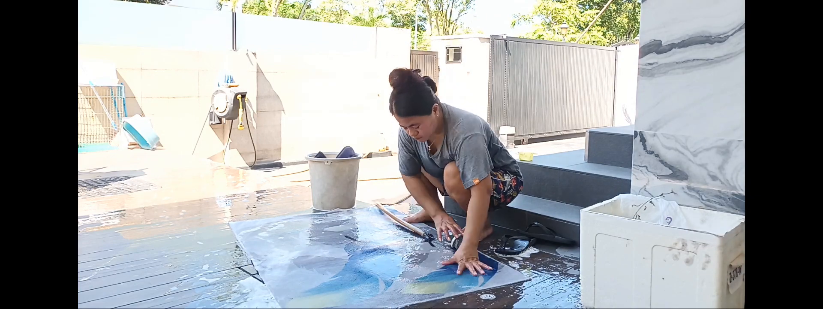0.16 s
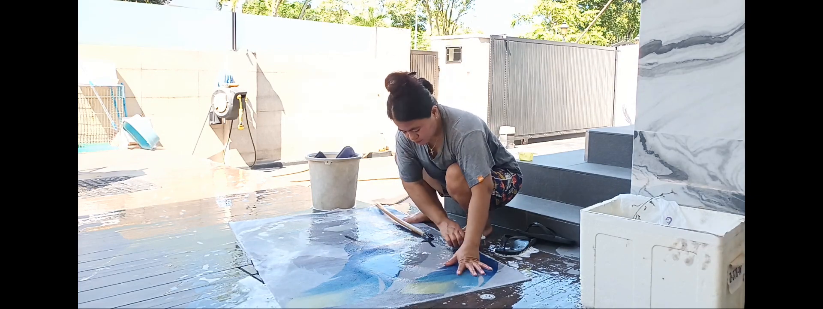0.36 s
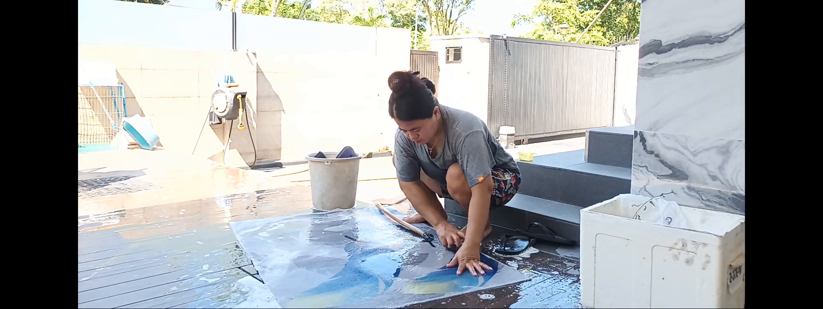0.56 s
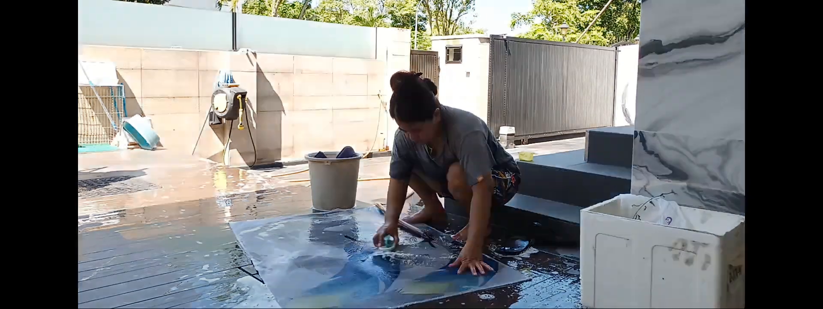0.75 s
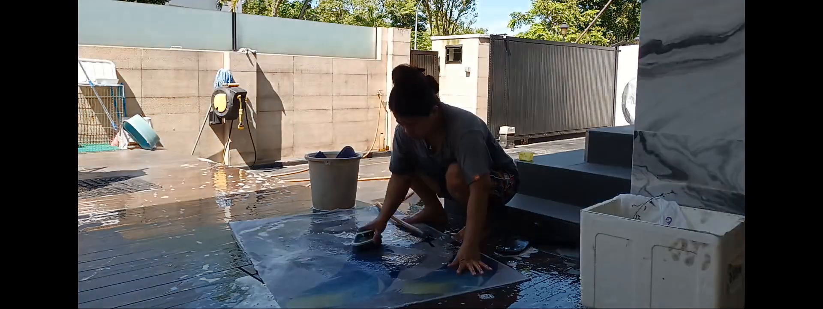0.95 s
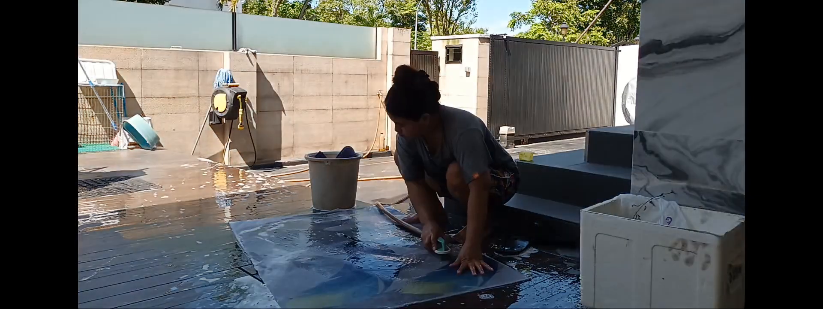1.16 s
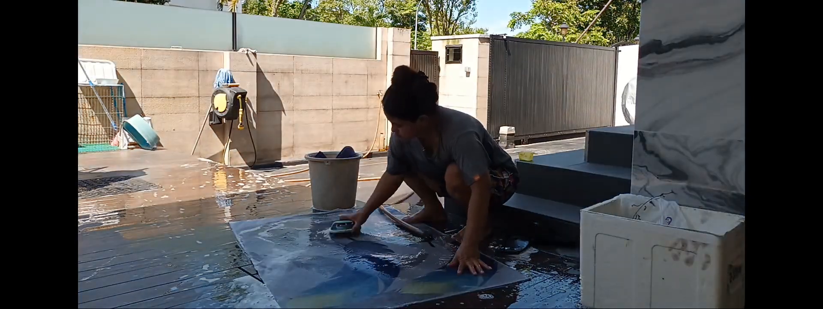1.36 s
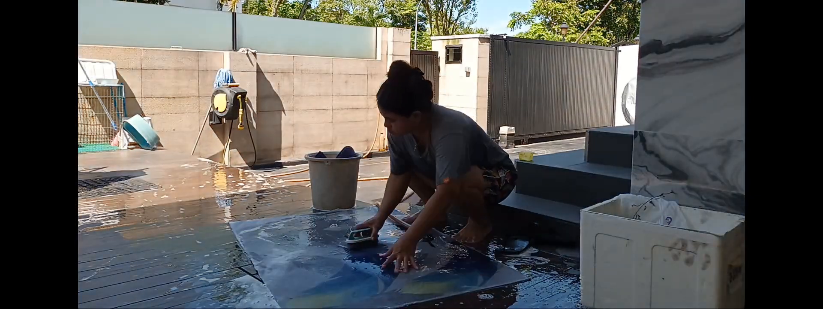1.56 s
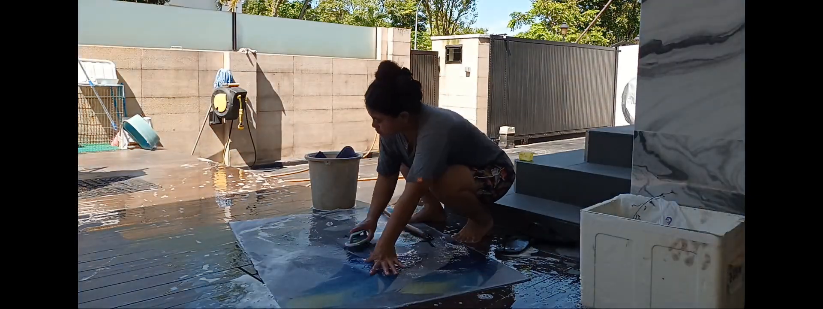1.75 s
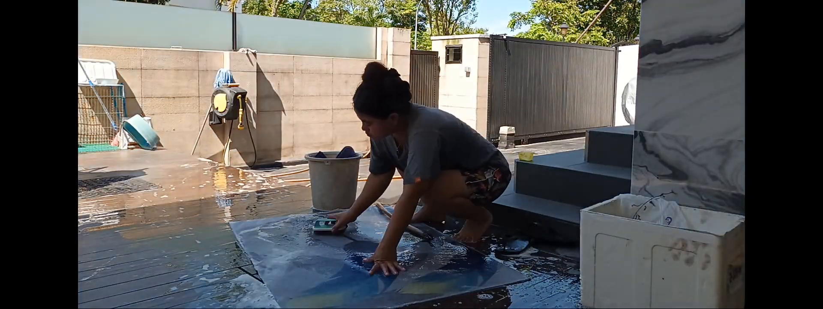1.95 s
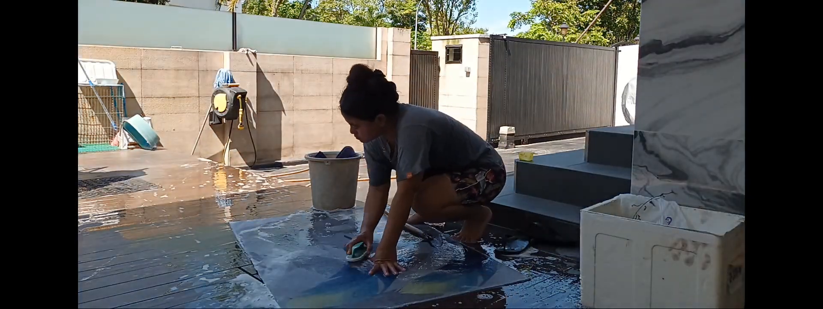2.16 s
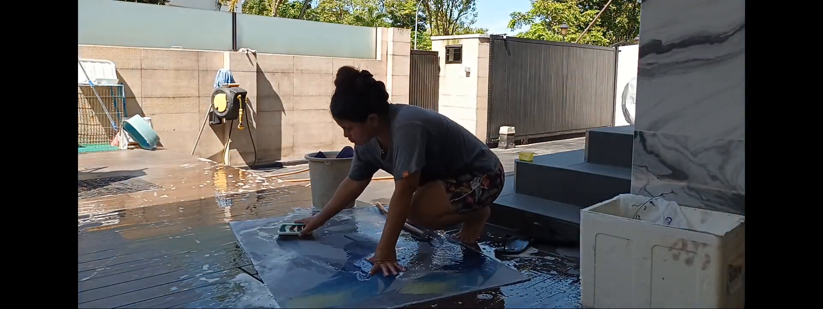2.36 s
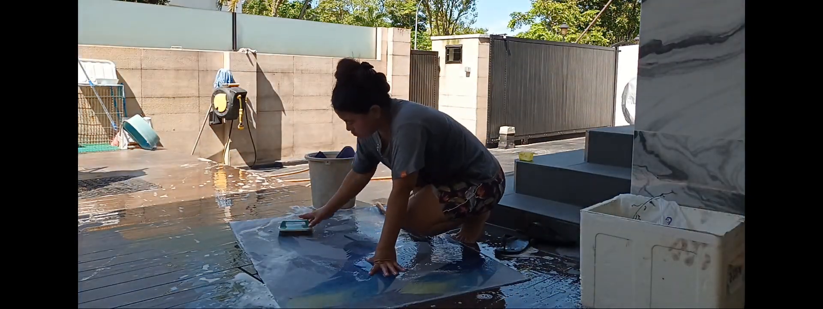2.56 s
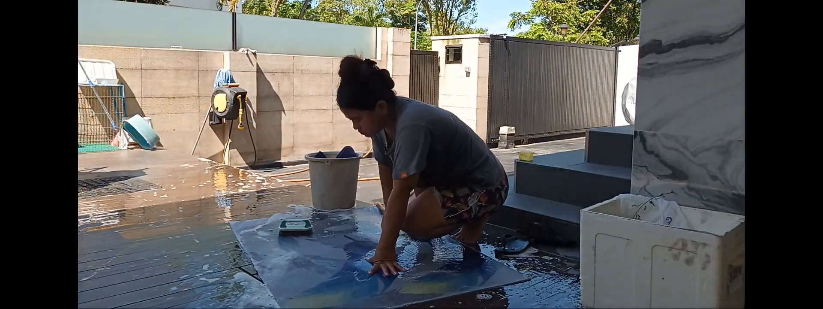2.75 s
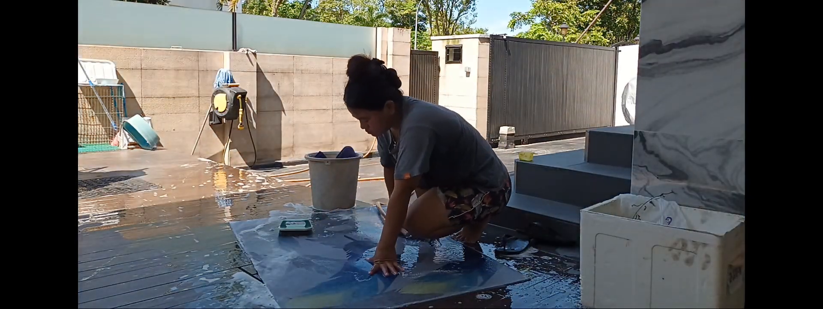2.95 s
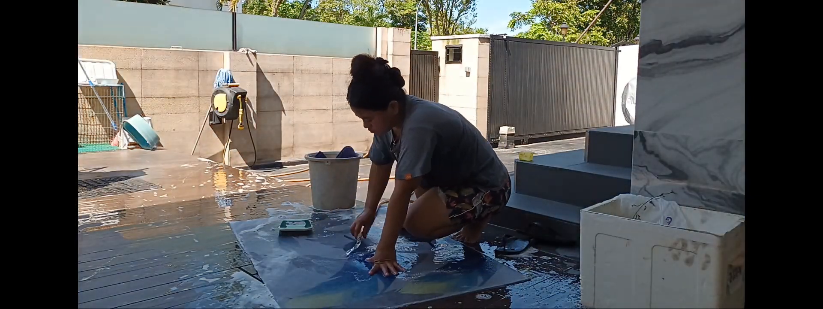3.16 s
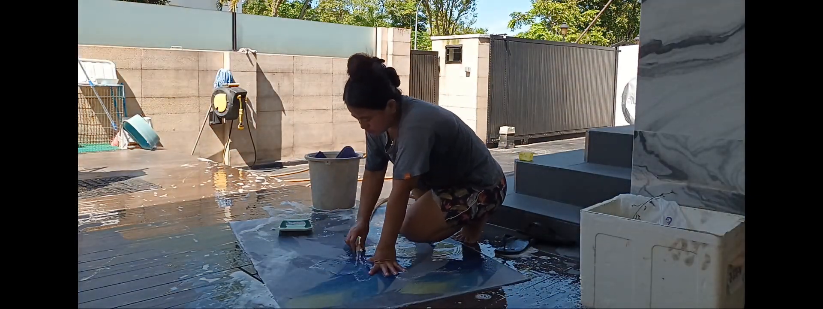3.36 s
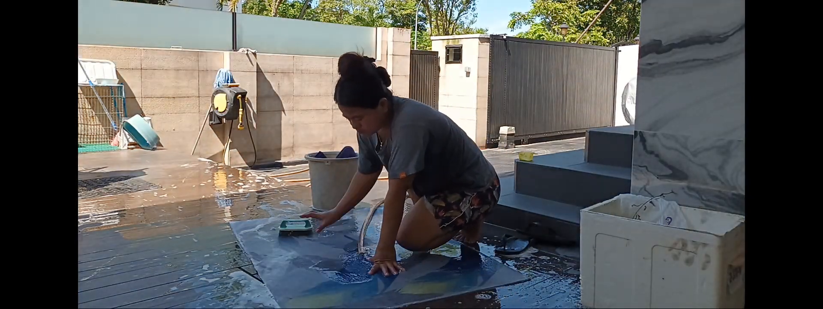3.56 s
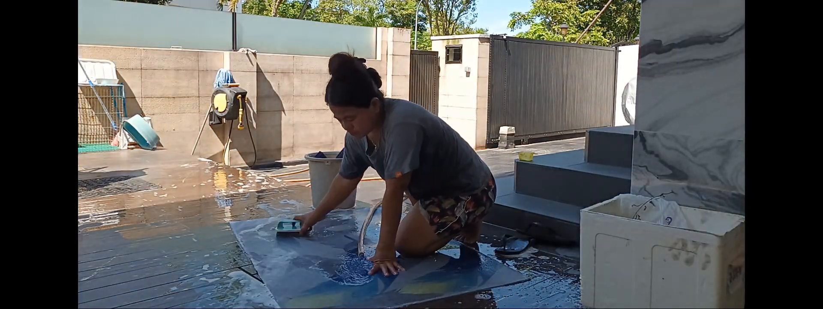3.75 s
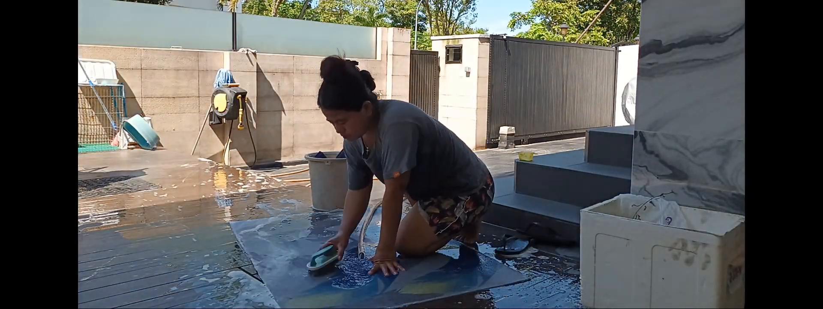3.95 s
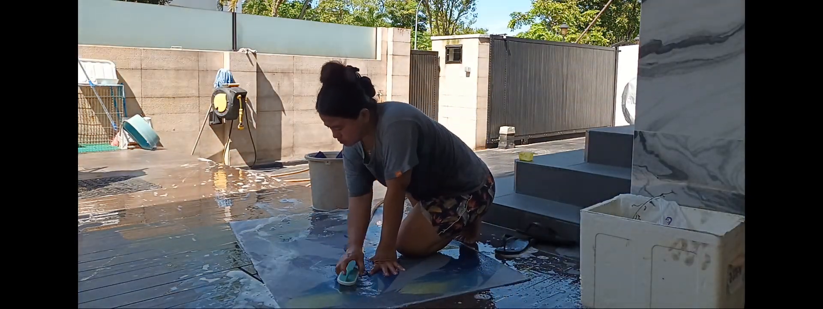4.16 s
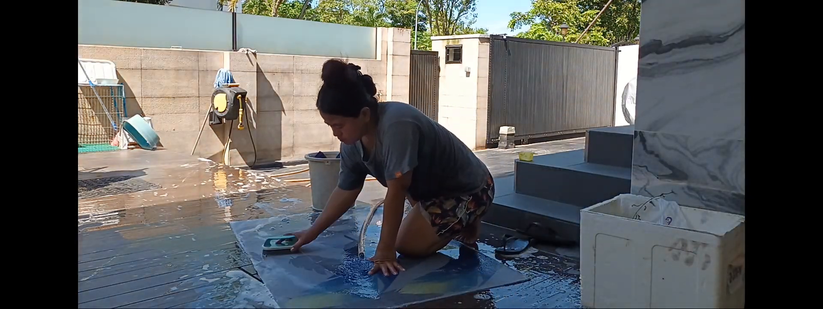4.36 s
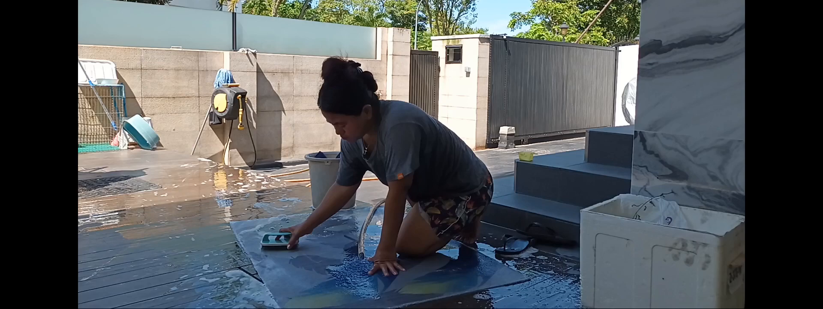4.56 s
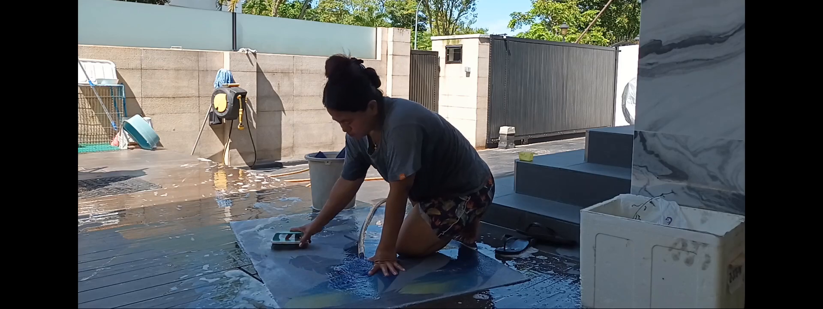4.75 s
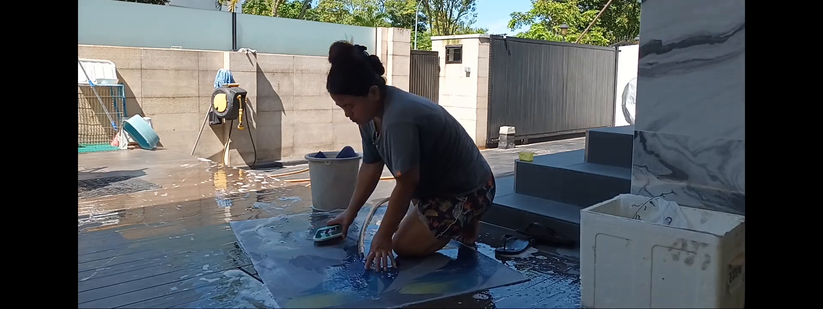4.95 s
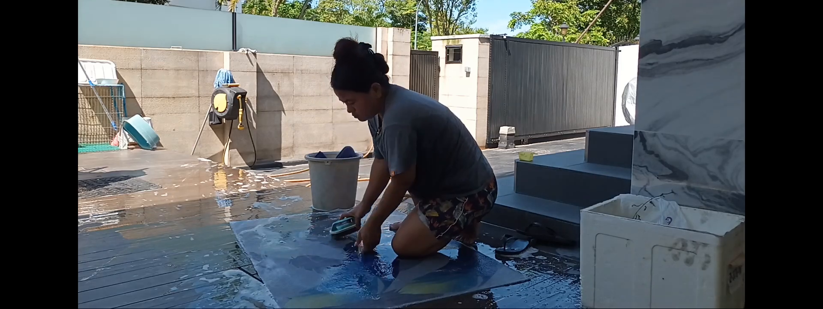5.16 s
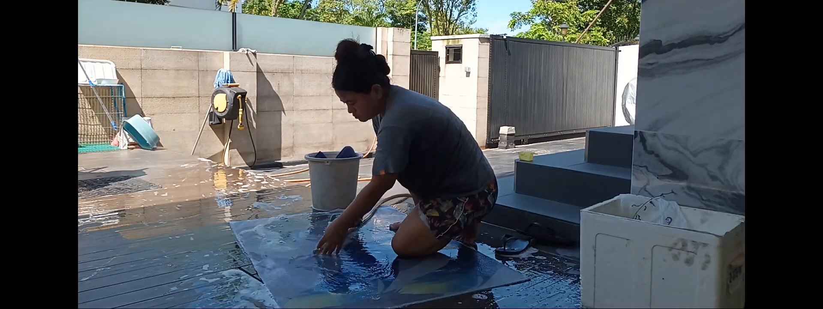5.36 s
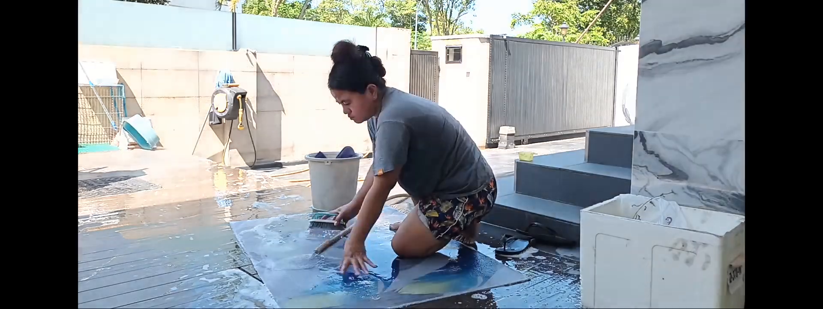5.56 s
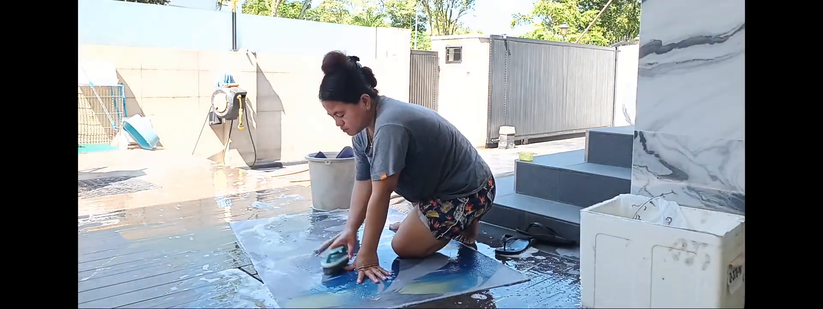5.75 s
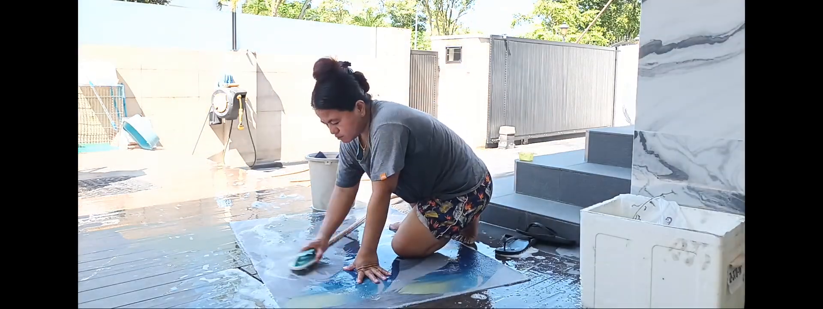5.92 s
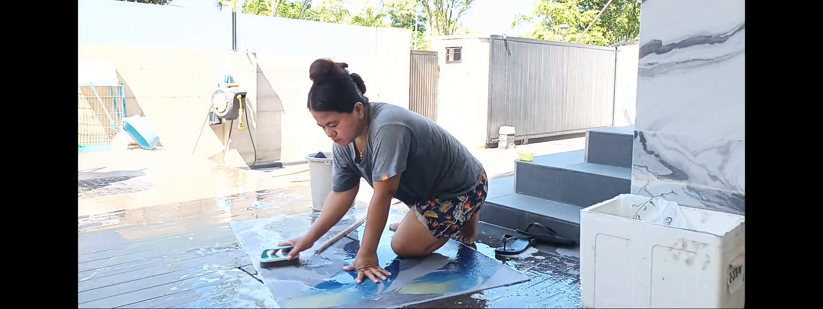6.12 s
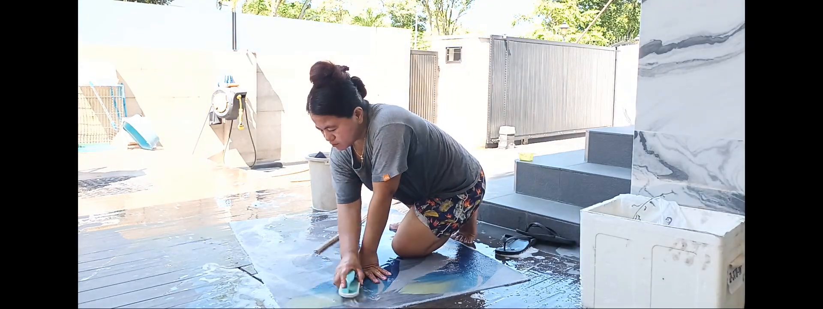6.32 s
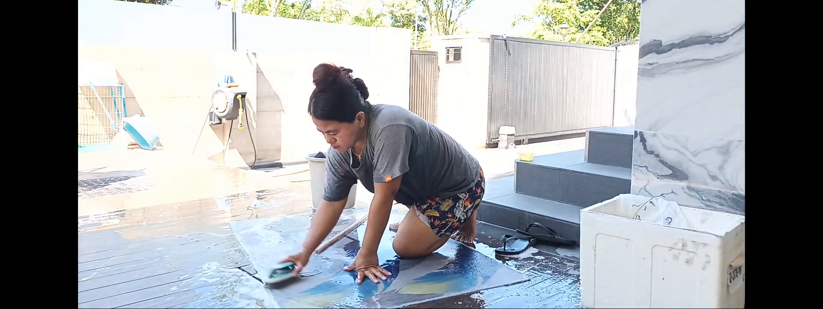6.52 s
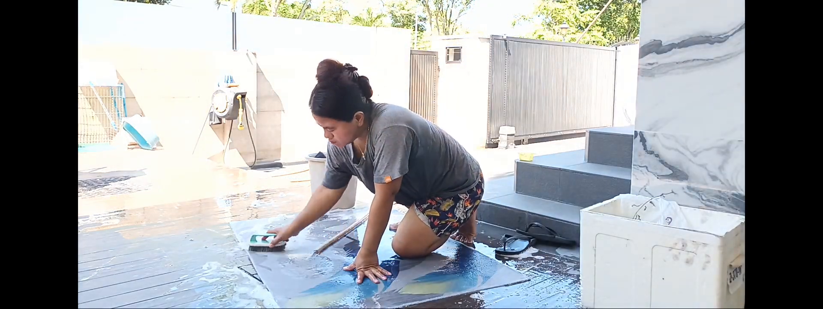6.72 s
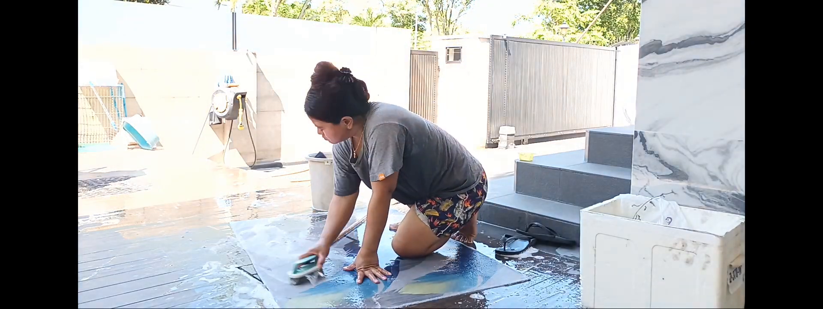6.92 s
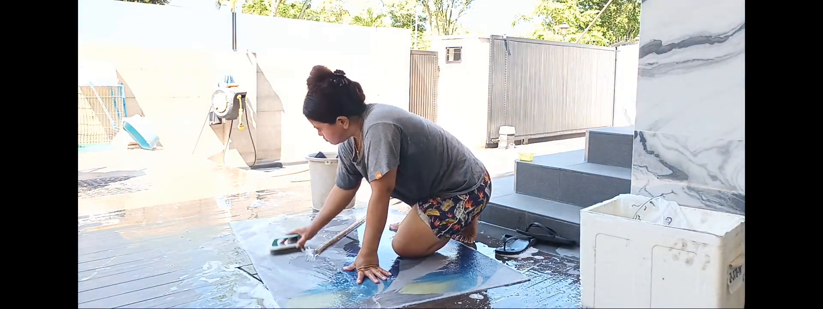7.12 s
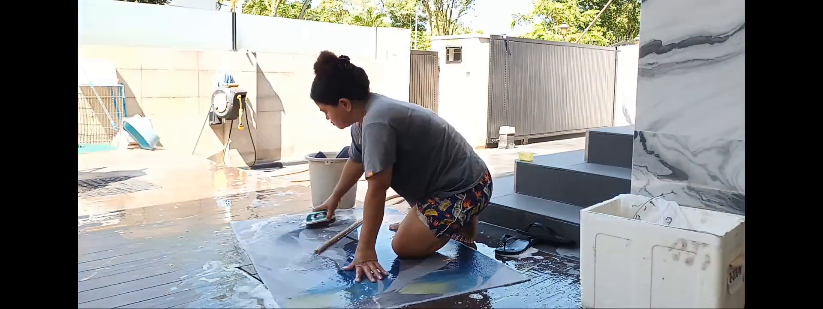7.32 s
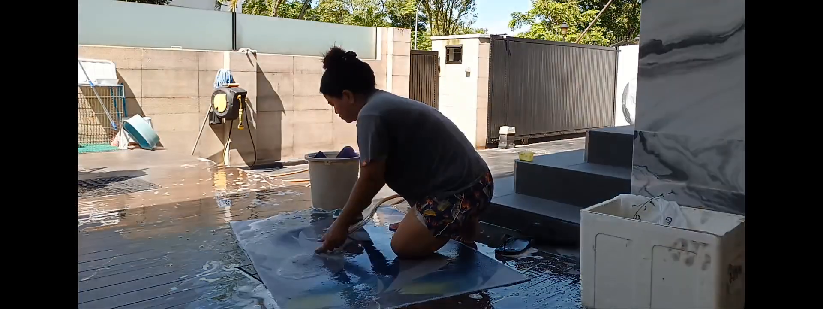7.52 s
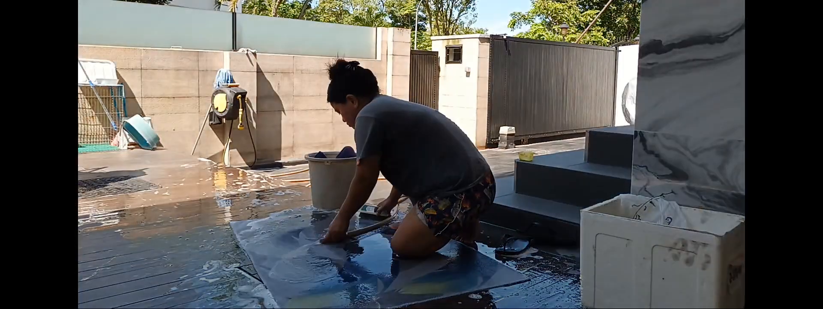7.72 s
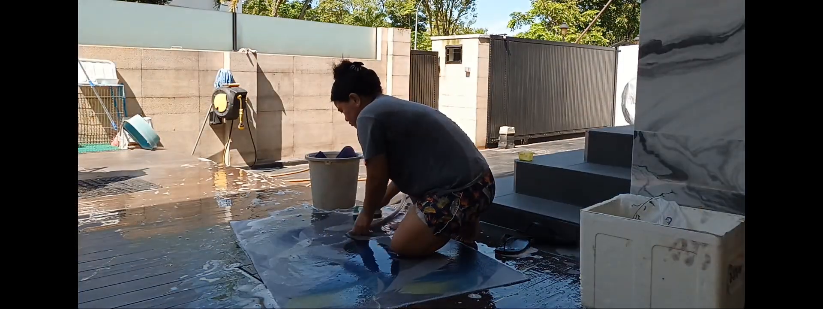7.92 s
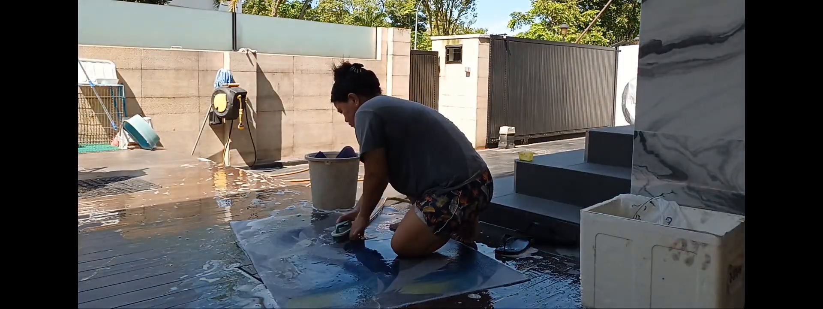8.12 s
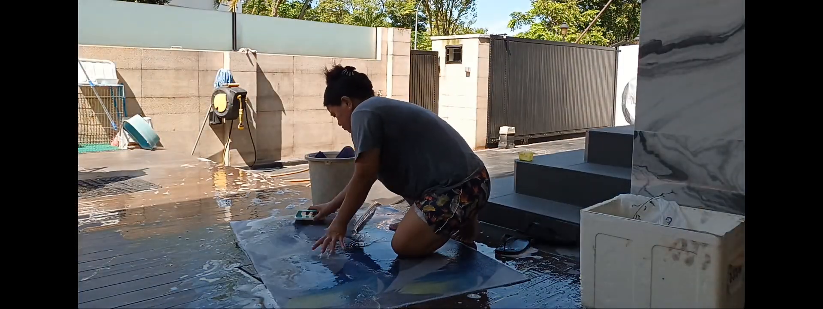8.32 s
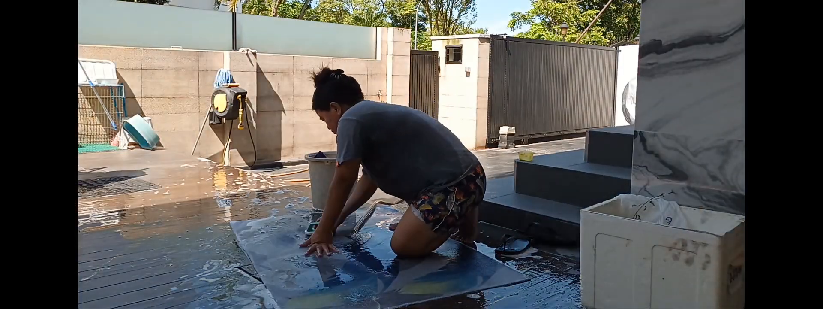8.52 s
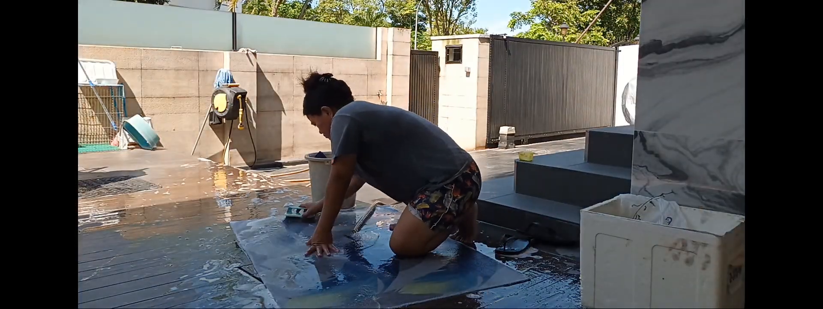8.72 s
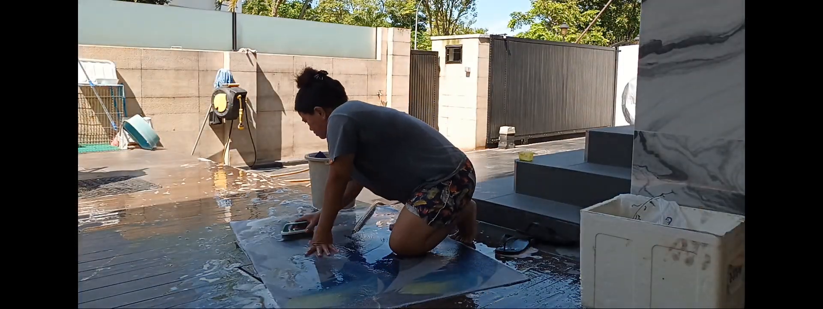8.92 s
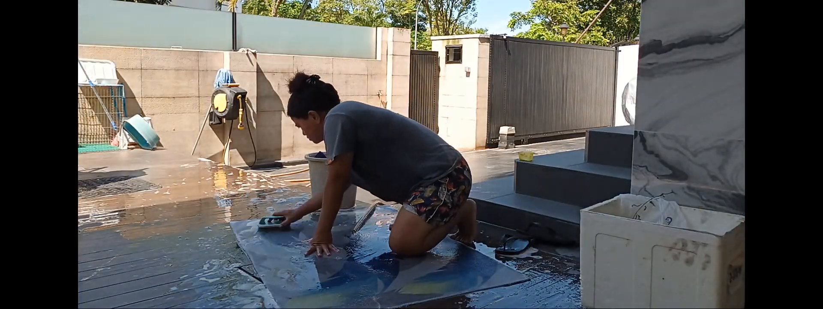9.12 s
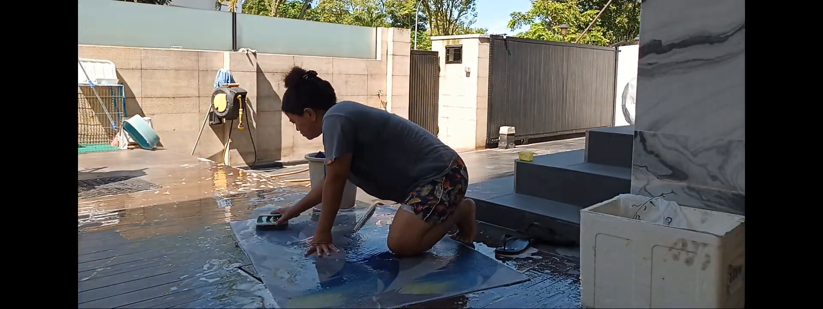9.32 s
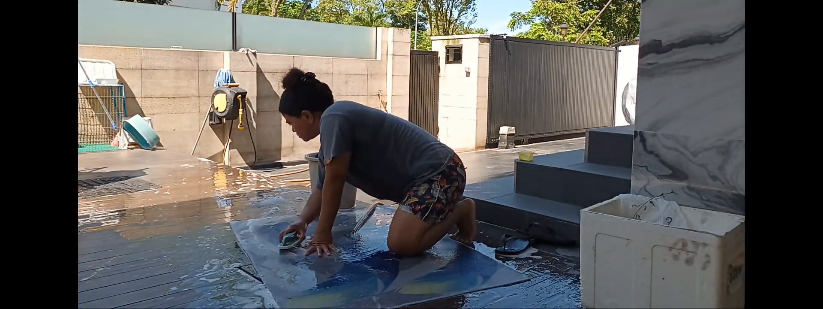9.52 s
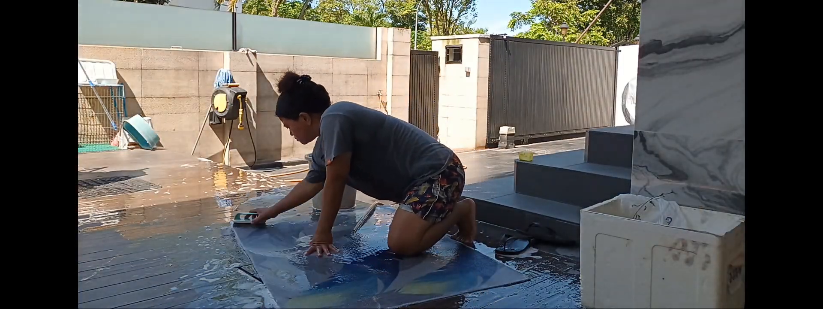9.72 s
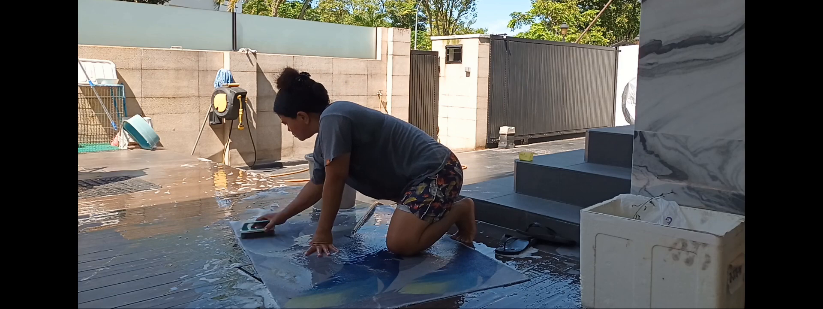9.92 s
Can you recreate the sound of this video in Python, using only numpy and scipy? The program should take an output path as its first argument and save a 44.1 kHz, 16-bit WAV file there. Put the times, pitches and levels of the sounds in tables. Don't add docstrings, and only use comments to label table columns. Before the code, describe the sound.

Raspy, sudsy scrubbing in short runs on a soaked mat, with wet gurgles, a drip and faint distant engine rumble outdoors.

```python
import sys
import numpy as np
from scipy import signal
from scipy.fft import rfft, irfft, next_fast_len
from scipy.io import wavfile
from scipy.ndimage import uniform_filter1d, map_coordinates

SR = 44100
rng = np.random.default_rng(int(sys.argv[2]) if len(sys.argv) > 2 else 0)


def rack_gain(trim_db):
    fader = np.asarray(trim_db, float)
    return 10 ** (fader / 20)


def wav_record(signal):
    frames = np.transpose(np.atleast_2d(signal))
    bounded = np.clip(frames, -1, 1)
    quanta = np.round(bounded * 32767).astype(np.int16)
    wavfile.write(sys.argv[1], SR, quanta)


N = 440118
T_S = np.arange(N) / SR


def unit(x):
    return x / np.sqrt(np.mean(x ** 2) + 1e-20)


def along(points, hz):
    f, v = np.transpose(points)
    return np.interp(np.log(hz + 1), np.log(f + 1), v)


def curves(rows):
    s, *cols = np.transpose(rows)
    return [np.interp(T_S, s, c) for c in cols]


def wobble(rate_hz):
    knots = rng.standard_normal(int(N * rate_hz / SR) + 4)
    return map_coordinates(knots, [np.arange(N) * rate_hz / SR])


def filtered(x, response):
    m = next_fast_len(N + 8192)
    return irfft(rfft(x, m) * response(np.fft.rfftfreq(m, 1 / SR)), m)[..., :N]


# f/Hz, likeness/0-1
PORT_LIKENESS = [(60, 0.96), (300, 1), (700, 0.18), (1300, 0.4), (2000, 0.35), (5000, 0.46), (9000, 0.48),
                 (15000, 0)]


def ports(pair, spectrum, alike=1):
    def share(hz):
        turn = np.arccos(np.clip(alike * along(PORT_LIKENESS, hz), 0, 1)) / 2
        return rack_gain(along(spectrum, hz)) * [np.cos(turn), np.sin(turn)]
    mid, side = filtered(pair, share)
    return unit(np.array([mid + side, mid - side]))


def slips(density, spread_db, patchy_db, size_bins, centre_hz=None, lift_db=0):
    clicks = rng.standard_normal((2, N)) * (rng.random(N) < density)
    clicks = clicks * rack_gain(spread_db * rng.standard_normal(N))
    hz, t, z = signal.stft(clicks, SR, nperseg=1024)
    field = uniform_filter1d(rng.standard_normal(z.shape[1:]), size=size_bins, axis=0)
    gain_db = patchy_db * unit(uniform_filter1d(field, size=4, axis=1))
    if centre_hz is not None:
        centre = centre_hz[np.minimum((t * SR).astype(int), N - 1)]
        gain_db = gain_db + lift_db * np.exp(-(np.log((hz[:, None] + 1) / centre) / 0.49) ** 2)
    return signal.istft(z * rack_gain(gain_db), SR, nperseg=1024)[1][:, :N]


def swells(rows, rise_power, fall_power):
    s, rise_s, fall_s = np.transpose(rows)[:3, :, None]
    late_s = np.arange(0, N / SR + .002, .001) - s
    u = late_s / np.where(late_s < 0, np.abs(rise_s), np.abs(fall_s))
    gain_db = -20 * np.abs(u) ** np.where(u < 0, rise_power, fall_power)
    return rack_gain(np.maximum(gain_db, -200)), np.clip(u, -1, 1)


def per_sample(x):
    return np.interp(T_S, np.arange(len(x)) / 1000, x)


def swelling(rows, rise_power, fall_power, column=3):
    return per_sample(rack_gain(np.transpose(rows)[column]) @ swells(rows, rise_power, fall_power)[0])


def decays(rows, rise_s):
    return sum(rack_gain(db - 60 * np.abs(T_S - s) / t60) * np.clip((T_S - s) / rise_s, 0, 1)
               for s, db, t60 in rows)


# t fastest/s, rise to -20 dB/s, fall to -20 dB/s, scrub/dB, swish re pile/dB
EVEN_STROKES = [(0.859, 0.17, 0.13, -35, -2), (1.062, 0.09, 0.15, -34.5, -7),
                (1.373, 0.14, 0.15, -29.5, -4), (1.623, 0.1, 0.13, -34.5, -8.5),
                (1.879, 0.099, 0.11, -28, -7), (2.089, 0.099, 0.15, -30, -10.5),
                (2.361, 0.12, 0.14, -30, -0.5), (2.5, 0.07, 0.066, -50, 5), (4.104, 0.05, 0.09, -47.5, -2),
                (4.352, 0.15, 0.18, -29.5, -6.5), (4.915, 0.18, 0.17, -46, -11)]
FIRM_STROKES = [
    (6.029, 0.14, 0.095, -32, -1.5),
    (6.639, 0.19, 0.16, -30.5, -1),
    (8.745, 0.084, 0.12, -31, -6),
    (9.187, 0.093, 0.12, -27.5, -6),
    (9.74, 0.14, 0.13, -31, -1),
]
FLAT_STROKES = [(4.54, .08, 0.13, -58, 12), (6.225, 0.085, .12, -34.5, -5.5), (6.3, 0.094, 0.18, -35.5, -9),
                (6.13, .08, 0.077, -45.5, -3), (6.904, 0.11, .13, -36, -1.5), (7.175, 0.11, 0.16, -30.5, 1),
                (7.309, 0.12, 0.096, -41, -2.5), (8.344, .11, 0.099, -36.5, -2),
                (8.559, .11, 0.09, -39, -1), (8.963, 0.092, .11, -32.5, -6),
                (9.421, 0.092, .14, -35.5, -4.5), (9.984, 0.09, .15, -37.5, -5)]
GRIP_TIPS_DB = [-2.5, -0.5, -5.5]
# t/s, rise/log ratio
REACH_CLIMB = [(.86, 0.16), (1.4, 0.27), (2.1, 0.32), (2.4, 0.072), (4.35, 0.15), (4.9, -0.015), (6, -0.18),
               (6.65, 0.086), (7.18, 0.2), (8.34, 0.14), (8.75, 0.12), (9.2, 0.17), (9.42, 0.38),
               (9.74, 0.2)]


def strokes():
    grips = EVEN_STROKES, FIRM_STROKES, FLAT_STROKES
    rows = np.vstack(grips)
    scrub_db, own_swish_db = rows[:, 3:4], rows[:, 4:]
    shape, u = swells(rows, rise_power=2.5, fall_power=2.02)
    gain = shape * rack_gain(scrub_db)
    early, falling = np.maximum(-u, 0), np.maximum(u, 0)
    late = falling * np.clip((scrub_db + 44) / 9, 0, 1)
    tips_db = np.repeat(GRIP_TIPS_DB, [len(g) for g in grips])[:, None]
    tips_db = tips_db + 2 * early - 0.41 * late - 3 * falling ** 4
    swish_db = 0.5 + own_swish_db * (1 - 0.85 * late - 0.41 * early) - 4.5 * early + 2.5 * late ** 1.15
    foam_db = -21 + 0.44 * own_swish_db + early + 16.5 * late ** 0.89
    climb = np.interp(rows[:, :1], *np.transpose(REACH_CLIMB)) * (1 - u ** 2)
    centre_hz = 2150 * np.exp(climb - 0.0033 * swish_db)
    total = gain.sum(axis=0)
    share = gain / total
    blended = [per_sample((share * x).sum(axis=0)) for x in (tips_db, swish_db, foam_db, centre_hz)]
    return [per_sample(total)] + blended


# t/s, half length/s, f/Hz, level/dB
HOLLOWS = [(0.835, 0.057, 2100, 4.5), (1.313, 0.034, 1930, 9.5), (1.835, 0.055, 2020, 4),
           (2.41, 0.1, 1900, -2), (3.92, 0.018, 2840, 6.5), (3.914, 0.027, 4900, 5),
           (3.98, 0.13, 2450, -12), (4.004, 0.022, 4800, 4), (4.12, 0.046, 1970, 5), (4.12, .04, 1150, 12),
           (4.35, 0.073, 2020, 8), (4.376, 0.05, 2650, 6), (4.62, 0.064, 2470, 10.5),
           (4.822, 0.068, 2620, -13), (4.863, 0.043, 1790, 7.5), (6.02, 0.045, 2000, 1.5),
           (6.014, 0.031, 1140, 14.5), (6.27, 0.036, 2000, -3.5), (4.8, .025, 1400, -10),
           (4.8, .02, 1900, -8), (4.58, 0.054, 1750, -7), (6.05, .04, 1250, -5), (6.575, 0.045, 2000, 3.5),
           (6.66, .04, 2600, 5), (6.59, .05, 1150, -9), (9.39, .035, 3650, 8.5), (9.215, .03, 2800, 4),
           (9.46, .03, 1250, -9), (9.37, .03, 1550, -6), (4.09, .015, 3000, 4), (4, .03, 1250, 14),
           (3.96, 0.033, 1300, 12), (3.89, .02, 1300, -8), (6.98, .04, 1600, 8.5), (6.737, 0.028, 950, 15),
           (7.33, .03, 780, 14), (4.48, .03, 960, 15), (9.02, 0.046, 1540, 8), (2.66, 0.12, 2450, 16),
           (6.34, .07, 2150, 0.5), (2.475, 0.073, 1600, 8), (9.46, 0.05, 3000, 5), (9.458, .06, 3900, 1),
           (7.137, 0.035, 2610, 8.5), (7.193, 0.047, 3000, 6.5), (7.2, 0.13, 2170, 3.5),
           (7.288, .04, 1490, 11), (8.335, 0.04, 2080, 11.5), (8.801, .04, 1360, 13.5),
           (8.813, 0.044, 1750, 8.5), (9.13, 0.028, 2100, 4), (9.727, 0.075, 2210, 7)]


def hollows(x):
    hz, t, z = signal.stft(x, SR, nperseg=512)
    gain_db = 0
    for s, half_s, centre_hz, db in HOLLOWS:
        off_pitch = np.log((hz[:, None] + 1) / centre_hz) / 0.081
        gain_db = gain_db + db * np.exp(-off_pitch ** 2 - ((t - s) / half_s) ** 4)
    return signal.istft(z * rack_gain(gain_db), SR, nperseg=512)[1][:, :N]


# f/Hz, level/dB
PILE_COLOUR = [(1800, -120), (2500, -10), (3000, -2.5), (4000, -0.5), (5000, -0.5), (6300, -1.5),
               (7200, -4.5), (8000, -13.5), (9000, -46), (11000, -120)]
TIPS_COLOUR = [(6000, -120), (7800, -13), (8500, -7), (9500, -3), (10200, 0), (11000, -2), (12000, -11.5),
               (13800, -19), (14300, -10.5), (15000, -8.5), (15800, -9.5)]
SWISH_COLOUR = [(900, -120), (1300, -13.5), (1700, -5.5), (2400, -5.5), (3000, -10), (3700, -13.5),
                (5000, -120)]
FOAM_COLOUR = [(700, -120), (950, -19.5), (1150, -3.5), (1400, -0.5), (1700, -5.5), (2500, -120)]
BIG_BUBBLE_COLOUR = [(480, -120), (700, -24), (810, -6), (950, 0), (1100, -7), (1500, -120)]
# t/s, peak/dB, t60/s
PATS = [
    (0.66, -48, 0.6),
    (3.887, -38.5, 0.18),
    (3.906, -32.5, 0.36),
    (4.004, -33.5, 0.18),
    (4.075, -55, 0.16),
    (4.209, -57, 0.088),
    (5.82, -43.5, 1),
]
# t/s, level/dB
SEEP = [(0, -76), (.6, -77), (2.5, -69), (3.2, -78), (5.7, -76.5), (7.4, -62), (7.62, -67), (7.72, -60),
        (7.9, -67.5), (8.03, -65.5), (8.1, -68), (8.16, -65.5), (8.3, -67), (9.98, -73)]
# t/s, foam/dB, big bubbles re foam/dB
WETNESS = [
    [(.75, 12.5, -13), (.95, 7.5, -10), (1.25, 7, -11.5), (1.4, 1.5, -12), (1.65, -0.5, -12),
     (1.85, 2.5, -17), (2.1, 0.5, -20), (2.3, 3.5, -11), (2.5, -4.5, -4.5)],
    [(4.0, 15, 7), (4.15, 15, -15), (4.3, 12, -13.5), (4.42, 2, -17), (4.55, -3, -20), (4.8, 13, -16),
     (4.9, 15.5, -18), (5.05, -3, -18)],
    [(5.9, 2.5, -2), (6.05, 8, -5.5), (6.24, -1, -20), (6.33, 5, -9), (6.45, 1, -9), (6.7, 3, -20),
     (6.9, 4.5, -22), (7.05, 9, -11), (7.17, -11, -16), (7.33, 2, -6)],
    [(8.35, -12, -9), (8.55, 0, -9), (8.75, -8, -13), (8.97, -5.5, -6), (9.2, -6, -12.5), (9.35, -1, -13),
     (9.52, 2, -10), (9.72, 2.5, -17.5), (9.9, -4, -5)],
]
# t/s, peak/dB, t60/s
POPS = [
    (2.9, -73, .3),
    (3.06, -74, .08),
    (3.3, -73, .35),
    (3.43, -75, 0.37),
    (5.16, -75, 0.4),
    (3.82, -69.5, 0.36),
    (5.819, -53, 0.17),
    (4.78, -66, 0.82),
    (8.148, -54, 0.2),
]
# t loudest/s, rise/s, fall/s, level/dB
SLOSH = [
    (.52, .1, 0.092, -71),
    (.62, 0.043, 0.045, -71),
    (5.33, 0.046, .06, -77),
    (5.5, 0.23, 0.14, -65.5),
    (5.69, 0.083, 0.12, -60),
    (5.83, 0.047, 0.084, -57),
    (7.97, 0.086, .1, -71),
]
RUN_STARTS_S, AIRBORNE_DB = [.69, 4.8, 5.822, 8.2], -15


def brush():
    scrub, tips_db, swish_db, foam_db, centre_hz = strokes()
    pats = rack_gain(-8.5) * decays(PATS, rise_s=0.0078)
    lifted = sum((T_S > s - .035) & (T_S < s) for s, _, _ in PATS) > 0
    airborne = sum(np.clip((s - T_S) / .02, 0, 1) * (T_S > s - .11) for s in RUN_STARTS_S)
    scrub = scrub * rack_gain(-5 * lifted + AIRBORNE_DB * airborne)
    seep = rack_gain(curves(SEEP)[0])

    pile = ports(slips(.4, spread_db=1.5, patchy_db=2, size_bins=6), PILE_COLOUR)
    clumps = rack_gain(1.37 * wobble(30))
    tips = clumps * ports(slips(.4, spread_db=-0.5, patchy_db=2, size_bins=8), TIPS_COLOUR)
    swish = ports(slips(.2, 0, patchy_db=2.5, size_bins=3, centre_hz=centre_hz, lift_db=9.5), SWISH_COLOUR)
    foam = ports(slips(.1, spread_db=3, patchy_db=3, size_bins=3), FOAM_COLOUR)
    bubbles = ports(slips(.1, spread_db=2.5, patchy_db=5, size_bins=3), BIG_BUBBLE_COLOUR)
    wet_db, big_db = curves(np.vstack(WETNESS))
    foam = foam + rack_gain(big_db) * bubbles

    air = filtered(tips, lambda hz: np.clip((hz - 11200) / 600, 0, 1))
    speed_db = np.clip(20 * np.log10(scrub + 1e-9) + 32, -12, 6)
    finest = air * scrub * rack_gain(tips_db) * (rack_gain(-0.5 + 0.26 * speed_db) - 1)
    mix = (scrub + pats + seep) * pile + finest + decays(POPS, rise_s=0.011) * (tips + 3 * air)
    # layer, stroke/dB, pat/dB, seep/dB re pile
    for layer, db, pat_db, seep_db in ((tips, tips_db, -2.5, 2),
                                       (swish, swish_db, -12, -6.5),
                                       (foam, foam_db + wet_db, -32.5, -8)):
        mix = mix + layer * (scrub * rack_gain(db) + pats * rack_gain(pat_db) + seep * rack_gain(seep_db))
    mix = mix + (foam + rack_gain(-6.5) * swish) * swelling(SLOSH, 1.35, 0.77)

    left, right = hollows(mix) * rack_gain(.3 * wobble(40) + .6 * wobble(400))
    sweep_samples = .5 + 1.5 * wobble(3)
    return np.array([map_coordinates(left, [np.arange(N) - sweep_samples]), right])


def cavities(rows):
    out, waver, flutter, jitter = np.zeros(N + SR), wobble(45), wobble(110), wobble(250)
    for s, hz, db, length_s in rows:
        start, stop = round(s * SR), round((s + length_s) * SR)
        u = np.linspace(0, 1, stop - start)
        rough = np.clip((-33 - db) / 13, .25, 1.1)
        swell = np.abs(np.sin(np.pi * u)) ** (.4 if hz < 250 else 1.2)
        own = (np.arange(start, stop) + int(97 * hz)) % N
        phase = 2 * np.pi * hz * np.cumsum(1 + .02 * waver[own] + .05 * rough * jitter[own]) / SR
        size = rack_gain(db - 2 + 2.5 * rough * flutter[own]) * swell
        out[start:stop] += size * (np.sin(phase) + 0.12 * np.sin(2 * phase))
    return out[:N]


# t/s, f/Hz, peak/dB, length/s
GURGLES = [(.365, 1520, -60, 0.036), (.48, 3950, -62, 0.05), (.487, 2230, -67, .03), (.5, 1950, -66, .06),
           (.445, 1273, -65.5, 0.1), (.585, 1340, -65, 0.091), (.625, 2060, -62.5, .06),
           (1.2, 520, -57.5, 0.54), (1.84, 618, -43.5, 0.099), (2.28, 343, -54.5, 0.049),
           (2.45, 611, -50, 0.14), (5.33, 1080, -68, .06), (5.385, 714, -57, 0.13), (5.44, 494, -48, 0.053),
           (5.46, 1150, -64, 0.15), (5.49, 690, -57, 0.17), (5.51, 216, -55.5, 0.1), (5.57, 500, -60, 0.06),
           (5.65, 595, -49, 0.12), (5.655, 1240, -59, 0.096), (5.65, 1670, -60, 0.06),
           (5.66, 2030, -64, .06), (5.755, 251.5, -44.5, 0.054), (5.795, 1127, -57, 0.049),
           (5.815, 618.3, -52, 0.1), (6.06, 492, -47, 0.048), (5.93, 600, -56, .2),
           (1.08, 709, -47.5, 0.052), (8.985, 345.4, -54, 0.087), (9.21, 1190, -40.5, 0.09),
           (9.048, 620, -59, 0.22), (9.3, 650, -59, 0.18), (2.3, 560, -58, .16), (1.45, 520, -58, .2),
           (5.8, 680, -55, .1), (7.15, 620, -58.5, 0.19), (9.26, 449, -53, 0.034), (9.335, 488, -45, 0.12),
           (9.6, 438, -56, 0.052), (9.8, 423, -44.5, 0.096), (9.93, 442, -47, .05), (9.94, 608, -47, 0.04)]


def gurgles():
    return cavities(GURGLES)


# t/s, f/Hz, peak/dB, t60/s
DRIPS = [
    (3.38, 2150, -65, 0.043),
    (7.5735, 2040, -40, 0.17),
    (7.678, 2340, -55, 0.045),
]


def drips():
    out = np.zeros(N + SR)
    t = np.arange(SR // 4) / SR
    modes = (1, .8), (.955, .5), (1.035, .3), (.985, .4), (.9, .2)
    for s, hz, db, t60 in DRIPS:
        ring = sum(share * np.sin(2 * np.pi * ratio * hz * t) for ratio, share in modes)
        out[round(s * SR):][:len(t)] += rack_gain(db - 60 * t / t60) * ring * (1 - np.exp(-t / .0007))
    return out[:N]


# t/s, peak/dB, t60/s
GULPS = [(5.612, -43, .2), (5.637, -34, 0.12), (5.69, -47, 0.25), (5.75, -46, .2), (5.81, -33, 0.21),
         (5.875, -48, 0.18), (5.915, -46, 0.2), (5.958, -37, .25), (5.998, -50, 0.1), (6.04, -45, 0.43),
         (6.09, -49, .2), (6.14, -47, 0.3), (6.18, -48, .25)]
# t/s, f/Hz
POCKET_PITCH = [(5.62, 337.4), (5.674, 345.5), (5.704, 308.5), (5.89, 346.6), (5.938, 300), (5.954, 331.6),
                (6.12, 317.5), (6.184, 349.4), (6.24, 307)]
# f/Hz, level/dB
FROTH_COLOUR = [(170, -120), (250, -8), (330, 0), (430, -9), (620, -17), (900, -120)]


def pocket():
    phase = 2 * np.pi * np.cumsum(curves(POCKET_PITCH)[0] * (1 + 0.033 * wobble(60))) / SR
    tone = rack_gain(2 * wobble(90)) * (np.sin(phase) + .06 * np.sin(2 * phase))
    froth = rack_gain(-8) * ports(rng.standard_normal((2, N)), FROTH_COLOUR)
    return decays(GULPS, rise_s=0.008) * (tone + froth)


# t/s, f/Hz, peak/dB, length/s
THUMPS = [(1.7, 90, -48, .04), (1.19, 97, -26.5, 0.081), (1.2, 53, -37, 0.088), (1.18, 182, -36, 0.088),
          (1.19, 260, -40, 0.088), (1.257, 333, -42, 0.075), (1.327, 382, -46, 0.041),
          (1.2, 460, -51, 0.0804), (1.265, 200, -54, 0.12), (4.71, 87, -42, .03), (4.73, 112.5, -34, 0.072),
          (4.73, 38.5, -37.5, 0.088), (4.8, 133, -44, 0.037), (4.74, 129, -43, 0.067),
          (4.73, 307, -46.5, 0.096), (4.74, 450, -49, 0.082), (4.84, 337, -48, 0.088),
          (4.4, 320, -67, 0.054)]


def knee_thumps():
    return cavities(THUMPS)


# t loudest/s, rise/s, fall/s, level/dB
SQUASH = [
    (1.2, .04, .22, -52.5),
    (1.45, .1, 0.16, -64),
    (2.35, .08, .2, -64),
    (4.75, .04, 0.19, -49.5),
    (8.5, 0.24, 0.35, -64.5),
    (9.4, 0.49, 0.59, -66.5),
]
# f/Hz, level/dB
CLOTH_COLOUR = [(100, -120), (170, -2), (260, -3), (380, -0.5), (550, -7), (900, -120)]


def knee_cloth():
    cloth = ports(slips(.3, spread_db=2.5, patchy_db=4, size_bins=2), CLOTH_COLOUR)
    return swelling(SQUASH, 1.6, 1.3) * cloth


# f/Hz, t60/s
YARD_T60 = [(200, 0.29), (2000, 0.26), (2400, 0.3), (2900, .22), (10000, 0.05)]


def yard(x):
    hz, t, z = signal.stft(rng.standard_normal((2, SR // 2)), SR, nperseg=256)
    tail = signal.istft(z * rack_gain(-60 * t / along(YARD_T60, hz)[:, None]), SR, nperseg=256)[1]
    late = np.pad(x, ((0, 0), (500, 0)))
    return signal.fftconvolve(late, tail / np.linalg.norm(tail[0]), axes=1)[:, :N]


# t loudest/s, rise/s, fall/s, thud/dB, second order/dB
ENGINE_BURSTS = [(.53, 0.12, 0.16, -65, -71), (.83, 0.032, 0.16, -74, -67), (1.4, 0.27, 0.069, -44, -52),
                 (1.6, 0.1, 0.1, -53, -70), (1.84, 0.041, 0.11, -63, -66), (2.36, 0.19, 0.18, -56, -68),
                 (2.87, 0.032, 0.067, -58, -77), (3.07, 0.1, 0.21, -62.5, -75),
                 (4.45, 0.071, 0.15, -70, -76), (4.85, 0.14, 0.11, -51, -61), (5.03, 0.15, 0.1, -58.5, -80),
                 (5.55, 0.093, 0.12, -62, -77), (6.02, 0.098, 0.063, -76, -90.5),
                 (6.13, 0.065, 0.11, -93, -80), (7.64, 0.28, 0.2, -49.5, -63),
                 (7.92, 0.1, 0.18, -55.5, -62.5), (8.8, 0.15, 0.2, -47, -62),
                 (9.1, 0.072, 0.12, -50.5, -67), (9.35, 0.098, 0.095, -49.5, -67),
                 (9.67, 0.091, 0.052, -48.5, -61), (9.85, 0.33, 0.22, -79, -62)]
# t/s, f/Hz
FIRING_RATE = [(0, 47.25), (1.2, 49.03), (1.6, 53.3), (3, 45.33), (4.7, 56.06), (5.1, 49.64), (7.5, 49.76),
               (8.85, 51.7), (9.1, 57.1), (9.35, 65.3), (9.68, 76.3), (9.98, 78)]
# f/Hz, level/dB
THUD_COLOUR = [(6, -120), (14, -7), (25, 5.5), (50, 2), (70, 1.5), (95, -9), (150, -120)]
SECOND_COLOUR = [(40, -120), (62, -37), (80, -11), (100, -0.5), (130, -5.5), (170, -36), (260, -120)]
RASP_COLOUR = [(80, -120), (115, -42), (150, -2), (220, -9), (320, -4), (450, -11.5), (700, -11),
               (1200, -120)]


def engine():
    def level_db(column, idle_db):
        idle = rack_gain(idle_db + 2 * wobble(7))
        return 20 * np.log10(swelling(ENGINE_BURSTS, 1.5, 1.65, column) + idle)
    thud_db, second_db = level_db(3, idle_db=-72), level_db(4, idle_db=-71)
    turns = np.cumsum(curves(FIRING_RATE)[0] * (1 + 0.0399 * wobble(30))) / SR
    firings = unit(np.diff(np.floor(turns), prepend=0) * rack_gain(2.2 * wobble(60)))
    clear = np.clip((np.maximum(thud_db, second_db) + 65) / 12, .05, .95)
    rumble = rng.standard_normal((2, N))
    drive = np.array([np.sqrt(clear) * firings + np.sqrt(1 - clear) * rumble[0], rumble[1]])
    thud = rack_gain(thud_db + 1) * ports(drive, THUD_COLOUR)
    second = rack_gain(second_db + 2) * ports(drive, SECOND_COLOUR)
    rasp = rack_gain(second_db - 5.5) * ports(drive + 1.36 * rng.standard_normal((2, N)), RASP_COLOUR)
    return thud + second + rasp


# f/Hz, level/dB
HUSH_COLOUR = [(90, -120), (150, 3.5), (200, -1.5), (300, -7.5), (500, -9.5), (1000, -15.5), (2000, -19.5),
               (5000, -19.5), (7000, -22.5), (8000, -37), (10000, -23), (12000, -33), (13500, -36),
               (15000, -27)]


def hush(scrub):
    power = np.abs(uniform_filter1d(scrub[0] ** 2, size=4000))
    loud = np.clip(np.sqrt(power) / rack_gain(-40), 0, 1)
    noise = slips(0.83, spread_db=-0.5, patchy_db=2.1, size_bins=4)
    return rack_gain(-66.5 + .4 * wobble(3) + 0.5 * loud) * ports(noise, HUSH_COLOUR, alike=0.57)


def scene():
    scrub = brush()
    left, right = gurgles() + drips() + knee_thumps() + np.zeros((2, 1)) + pocket()
    wet = np.array([np.roll(left, -5), right])
    echo = yard(rack_gain(-14) * scrub + rack_gain(-17) * wet)
    return scrub + wet + knee_cloth() + echo + engine() + hush(scrub)


def roll_off(x):
    return signal.sosfilt(signal.butter(12, 17050, fs=SR, output="sos"), x)


# f/Hz, level/dB
LEFT_COLOUR = [(40, -1), (150, -1), (600, -1.5), (1200, -.4), (3000, -0.5), (9500, 1.5), (12000, -4),
               (15000, -3)]
LAG_SAMPLES, TOP_HZ = 45, 15800


def record(dry):
    def response(hz):
        half = rack_gain(along(LEFT_COLOUR, hz) / 2) * np.exp(-1j * np.pi * hz * LAG_SAMPLES / SR)
        return (hz < TOP_HZ) * np.array([half, 1 / half])
    return roll_off(filtered(dry, response))


dry = scene()
out = record(dry)
wav_record(out)
```